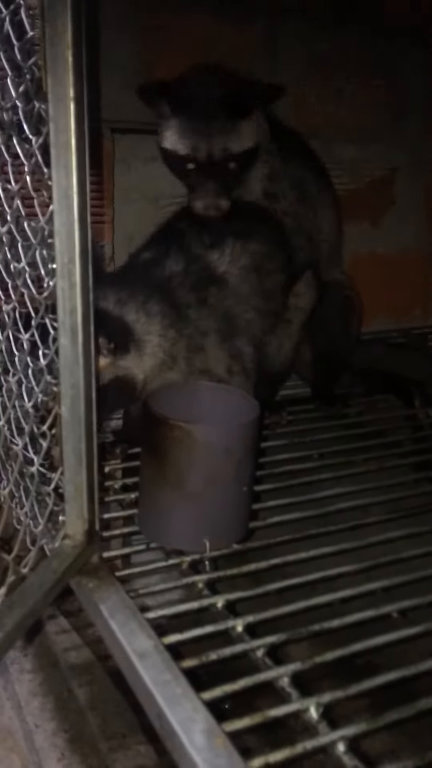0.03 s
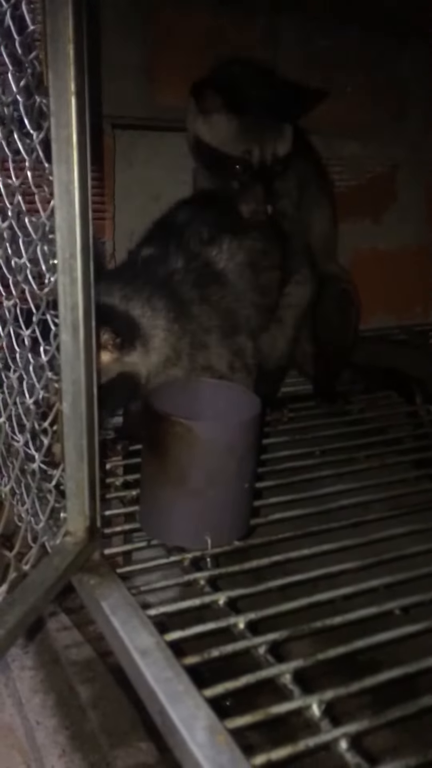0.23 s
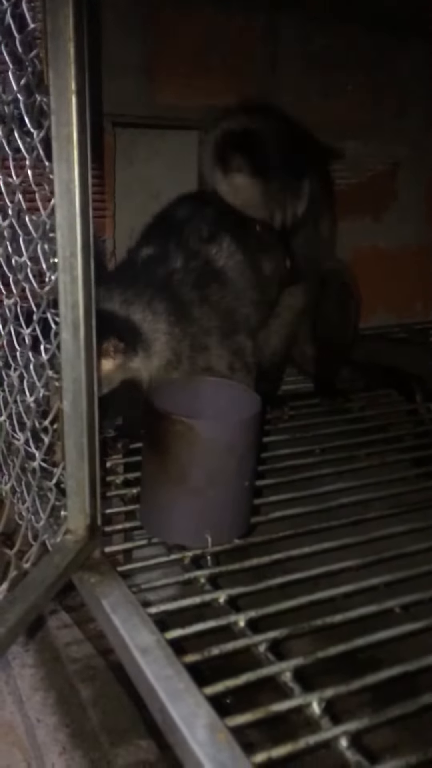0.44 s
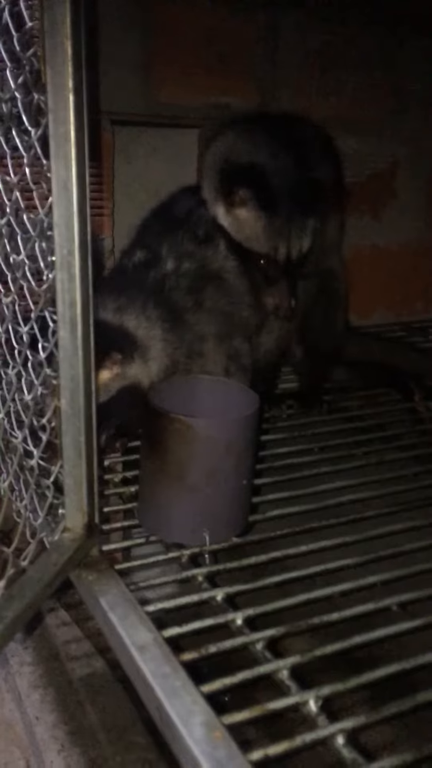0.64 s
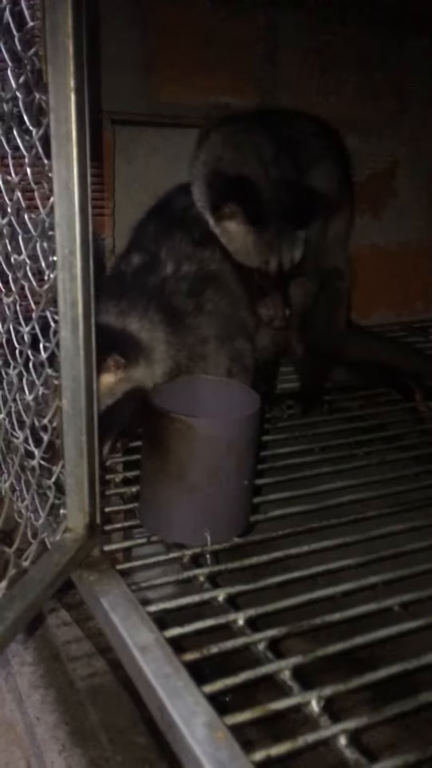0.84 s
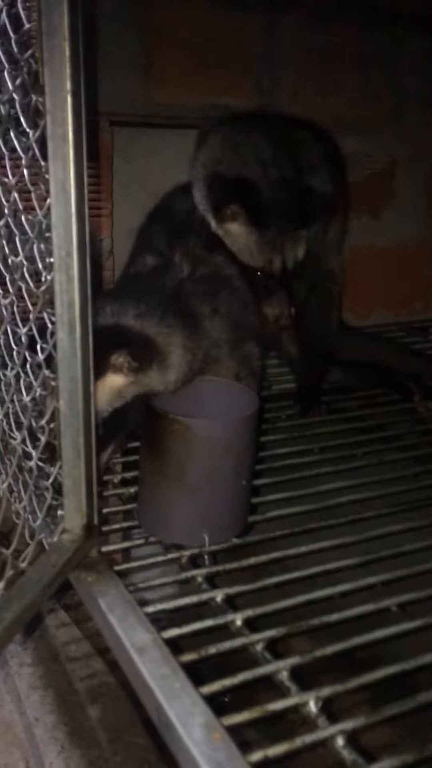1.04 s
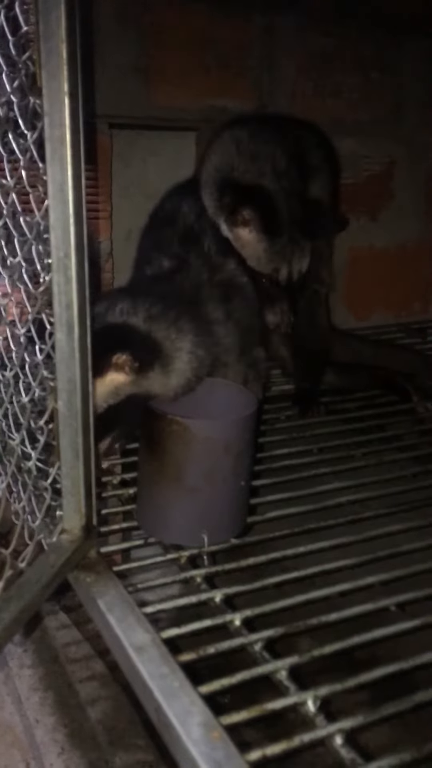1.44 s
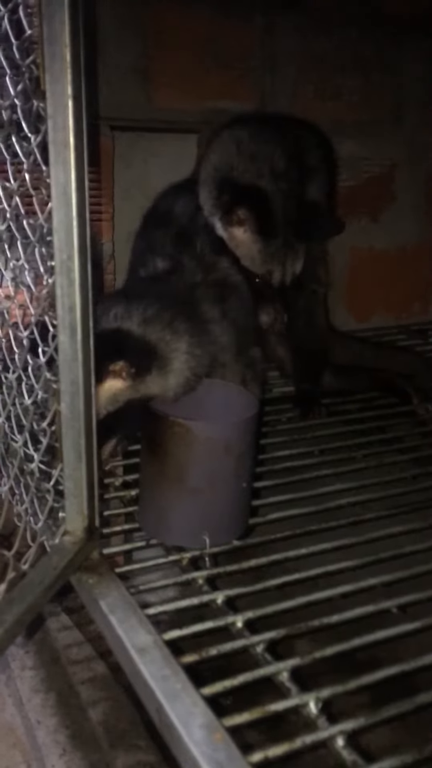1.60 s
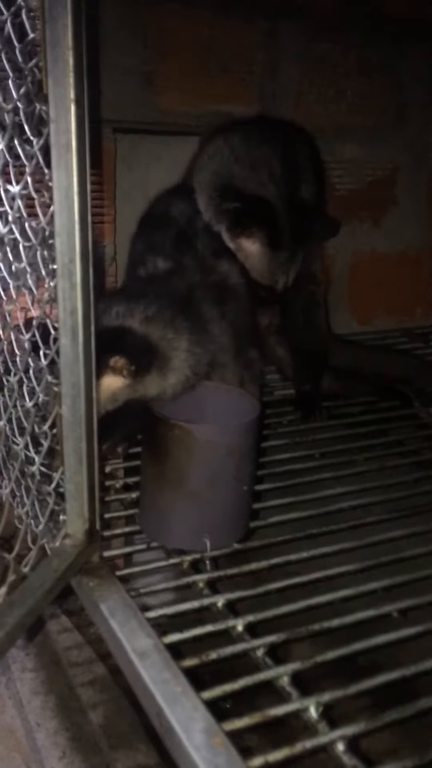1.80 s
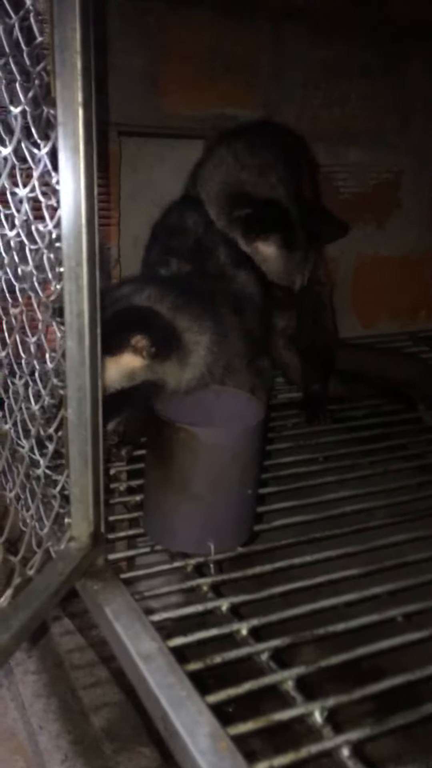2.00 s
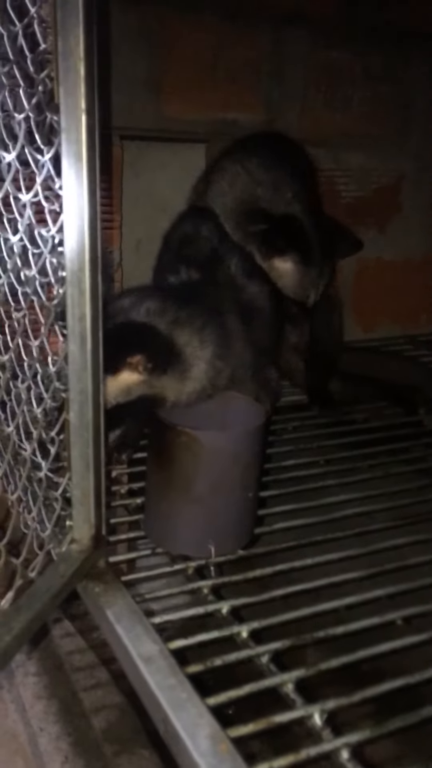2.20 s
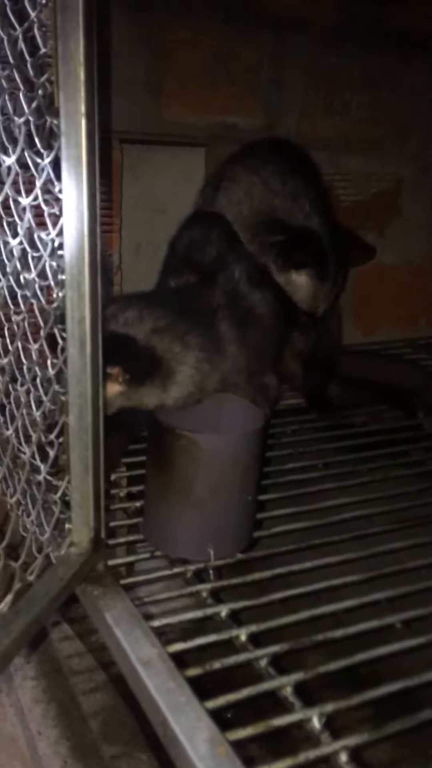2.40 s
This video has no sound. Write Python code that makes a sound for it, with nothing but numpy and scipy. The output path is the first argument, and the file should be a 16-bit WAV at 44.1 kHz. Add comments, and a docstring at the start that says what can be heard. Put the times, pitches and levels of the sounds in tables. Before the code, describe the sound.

Civets squeal close by in a wire cage, about five high, rising and falling calls a second. A faint thin whine lies under the first 0.25 seconds. The squeals are loudest and highest from 0.3 to 0.9 seconds, turning mostly lower and raspier from 1.7 until 2.5. Faint hisses and scuffles accompany them, with soft bumps near 0.5, 1.6 and 1.7, brief room reverberation and a faint low rumble.

```python
"""Civets squabbling in a cage

Two civets call in a wire cage in a small brick room, close to a mono microphone. One squeals in rapid
arches of pitch, a harmonic source filtered by throat and mouth, clear at the top and rasping when low;
the other holds a thin whine at first. Hisses, thin squeaks, scuffling and soft bumps go with the calls.
The cage resonates and the walls reverberate briefly over a low background rumble."""
import sys
import numpy as np
from scipy import signal
from scipy.fft import rfft, irfft, next_fast_len
from scipy.io import wavfile
from scipy.ndimage import uniform_filter1d, map_coordinates

SR = 44100
rng = np.random.default_rng(int(sys.argv[2]) if len(sys.argv) > 2 else 0)


def to_wav(s):
    """Save 16-bit WAV."""
    ch = np.atleast_2d(s).T  # columns
    pcm = np.round(np.clip(ch, -1, 1) * 32767)  # PCM
    wavfile.write(sys.argv[1], SR, pcm.astype(np.int16))


N = 112454
TIME_S = np.arange(N) / SR
BAND_LIMIT_HZ = 15750


def amp(db):
    """Amplitude ratio of a level in decibels."""
    return 10 ** (np.asarray(db) / 20)


def level_at(spectrum, hz):
    """Spectral envelope: levels interpolated on a logarithmic frequency axis."""
    freq_hz, level_db = np.transpose(spectrum)
    return np.interp(np.log(hz + 1), np.log(freq_hz + 1), level_db)


def contours(rows):
    """Linear interpolation in time of each column after the first."""
    time_s, *columns = np.transpose(rows)
    return [np.interp(TIME_S, time_s, column) for column in columns]


def gate(start, end, attack_s, release_s):
    """Trapezoidal envelope: rises from start, falls after end."""
    return np.clip((TIME_S - start) / attack_s, 0, 1) * np.clip(1 + (end - TIME_S) / release_s, 0, 1)


def swell(start, end):
    """Half-sine envelope from start to end."""
    return np.sin(np.pi * np.clip((TIME_S - start) / (end - start), 0, 1))


def wobble(knots_per_s):
    """Random modulation: a spline through Gaussian values."""
    return map_coordinates(rng.standard_normal(4096), [TIME_S * knots_per_s], mode="mirror")


def filtered(x, response):
    """Linear filtering: the spectrum is multiplied by a frequency response."""
    size = next_fast_len(N + SR // 4)
    return irfft(rfft(x, size) * response(np.fft.rfftfreq(size, 1 / SR)), size)[..., :N]


def noise(spectrum):
    """Spectral shaping of white noise, scaled to rms 1."""
    shaped = filtered(rng.standard_normal(N), lambda hz: amp(level_at(spectrum, hz)))
    return shaped / np.sqrt(np.mean(shaped ** 2) + 1e-20)


# spectra of the rumble and the room air: frequency_hz, gain_db
RUMBLE_SPECTRUM = [(22, -24), (60, 1), (100, 3), (119, -10), (160, -0.5), (280, -5), (1500, -61)]
AIR_SPECTRUM = [(100, -43.5), (600, 1), (2000, -0.5), (3600, -13.5), (7000, -11), (15000, -33)]
# envelope of the rumble: time_s, level_db
RUMBLE_LEVELS = [(0.0, -57), (2.12, -55), (2.22, -50)]

def background():
    """Ambient noise: a low rumble that rises near the end, and faint steady room air."""
    level_db, = contours(RUMBLE_LEVELS)
    return noise(RUMBLE_SPECTRUM) * amp(level_db) + noise(AIR_SPECTRUM) * amp(-53)


def room(x, t60_s=0.22, tail_db=-2, walls_db=-4, spread_s=0.018, predelay_s=0.003):
    """Reverberation: convolution with early wall reflections and an exponentially decaying diffuse tail."""
    t = np.arange(SR // 2) / SR
    tail = rng.standard_normal(len(t)) * amp(-60 * t / t60_s)
    delays = (rng.random(10) * spread_s * SR).astype(int)
    walls = np.bincount(delays, rng.standard_normal(10), len(t))
    response = amp(tail_db) * tail / np.linalg.norm(tail) + amp(walls_db) * walls / np.linalg.norm(walls)
    return signal.fftconvolve(x, np.pad(response, (int(predelay_s * SR), 0)))[:N]


# narrow resonances of the cage: frequency_hz, gain_db
CAGE_MODES = [(2129, 3.5), (2305, 9.5), (2502, 3), (4315, 9), (4470, 7)]

def cage(x, bandwidth_hz=15.2):
    """Sympathetic resonance: each mode rings on when a sound sweeps through its frequency."""
    def response(hz):
        damping = 1j * hz * bandwidth_hz
        return sum(amp(db) * damping / (mode_hz ** 2 - hz ** 2 + damping) for mode_hz, db in CAGE_MODES)
    return filtered(x, response)


# soft bumps on the cage floor: start_s, level_db
BUMPS = [(0.452, -43), (1.555, -47), (1.708, -44.5)]

def bumps(pitch_hz=577, t60_s=0.22, attack_s=0.0057):
    """Damped free vibration: the soft impact of a body excites one mode of the cage floor."""
    out = np.zeros(N)
    for start, level_db in BUMPS:
        age = np.maximum(TIME_S - start, 0)
        envelope = amp(level_db - 60 * age / t60_s) * (1 - np.exp(-age / attack_s))
        out += envelope * np.sqrt(2) * np.sin(2 * np.pi * pitch_hz * age)
    return out


# Gaussian swells of rubbing: centre_s, sigma_s, level_db
SCUFFLES = [(0.442, 0.032, -51.5), (1.436, 0.1, -50), (2.258, 0.11, -50)]
# spectrum of the rubbing: frequency_hz, gain_db
SCUFFLE_SPECTRUM = [(330, -10.5), (540, 9.5), (1300, -2.5), (8000, -44)]

def scuffles(flutter_db=1.4):
    """Friction noise: dull, uneven rubbing as the animals shift."""
    envelope = sum(amp(db) * np.exp(-.5 * ((TIME_S - at) / sigma) ** 2) for at, sigma, db in SCUFFLES)
    return noise(SCUFFLE_SPECTRUM) * envelope * amp(flutter_db * wobble(60))


# puffs of hiss: start_s, end_s, level_db
HISSES = [(0.187, 0.486, -55), (0.54, 0.736, -49.5), (1.047, 1.324, -45.5), (1.44, 1.71, -46),
          (1.957, 2.172, -49)]
# spectrum of the hiss: frequency_hz, gain_db
HISS_SPECTRUM = [(900, 4.5), (2200, 16), (4600, 3), (7000, -1), (10000, -3.5), (15500, -1)]

def hisses():
    """Turbulence noise: air forced through the mouth swells and fades."""
    return noise(HISS_SPECTRUM) * sum(amp(db) * swell(start, end) for start, end, db in HISSES)


# thin whistling squeaks: start_s, end_s, pitch_hz, level_db
SQUEAKS = [(1.396, 1.406, 2980, -33.5), (2.078, 2.366, 8290, -55.5)]

def squeaks(pitch_drift=0.0074):
    """Pure tones with slight random frequency modulation, each swelling and fading."""
    warped_s = np.cumsum(1 + pitch_drift * wobble(90)) / SR
    return sum(amp(db) * swell(start, end) * np.sqrt(2) * np.sin(2 * np.pi * hz * warped_s)
               for start, end, hz, db in SQUEAKS)


# contour of the other civet's whine: time_s, pitch_hz, relative_level_db
WHINE_CONTOUR = [(0.0, 1553, -52), (0.045, 1510, -60.5), (0.135, 1557, -59), (0.25, 1440, -56)]
# its harmonics, from the fundamental upward: gain_db
WHINE_HARMONICS = [-2.5, -0.5, 3.5, -5.5, -5, -27, -30, -23]

def whine(jitter=0.009, gain_db=2.5):
    """A harmonic series on a nearly level fundamental; frequency jitter makes the thin note quaver."""
    pitch_hz, level_db = contours(WHINE_CONTOUR)
    phase = 2 * np.pi * np.cumsum(pitch_hz * (1 + jitter * wobble(518.4))) / SR
    tone = np.sqrt(2) * sum(amp(db) * np.sin(k * phase) for k, db in enumerate(WHINE_HARMONICS, 1))
    envelope = gate(WHINE_CONTOUR[0][0], WHINE_CONTOUR[-1][0], attack_s=0.00068, release_s=0.035)
    return tone * amp(level_db + gain_db) * envelope


# response of the squealer's throat and mouth: frequency_hz, gain_db
TRACT_RESPONSE = [(1000, -20), (1500, -15.5), (2000, -4.5), (2700, -1), (3300, 0.5), (3800, -8), (4400, 7),
                  (5000, -2), (5500, 2.5), (7000, -1), (8300, -12), (10500, -25), (14000, -26)]

def vocal_tract_db(hz, pitch_hz, lowness, mouth_db, formant_db=7, sigma_octaves=0.54):
    """Formant filtering: as pitch climbs, the main resonance rises and the opening mouth lifts the treble."""
    formant_hz = np.interp(lowness, [0, 1], [2560, 2180])
    peak_db = formant_db * np.exp(-.5 * (np.log2(hz / formant_hz) / sigma_octaves) ** 2)
    lift_db = mouth_db + 9 * np.log2(pitch_hz / 2250)
    treble_share = np.interp(hz, [1500, 5000], [0, 1])
    return level_at(TRACT_RESPONSE, hz) + peak_db + lift_db * treble_share


def voiced_tone(phase, pitch_hz, lowness, mouth_db, doubling, tilt_db_per_octave=-4.5):
    """Source-filter model: the tract weights the harmonics; period doubling adds lines between them."""
    def gain(order):
        hz = order * pitch_hz
        level_db = vocal_tract_db(hz, pitch_hz, lowness, mouth_db) + tilt_db_per_octave * np.log2(order)
        return amp(level_db) * (hz < BAND_LIMIT_HZ)

    def partials(order):
        return (gain(order) * np.sin(order * phase)).sum(0)

    harmonics = np.arange(1, 13)[:, None]
    harmonic_rms = np.sqrt((gain(harmonics) ** 2).sum(0) / 2)
    return (partials(harmonics) + doubling * partials(harmonics + .5)) / harmonic_rms


# one contour for each squeal: time_s, pitch_hz, relative_level_db
SQUEAL_CONTOURS = [
    [(0.061, 2055, -42), (0.085, 1898, -39), (0.115, 1664, -58)],
    [(0.213, 2487, -55), (0.218, 2422, -33.5), (0.228, 1910, -41), (0.24, 1370, -36), (0.258, 944, -35)],
    [(0.275, 953, -28), (0.298, 1545, -41.5), (0.311, 2384, -31.5), (0.338, 2900, -34.5),
     (0.355, 3075, -36.5), (0.372, 2892, -83), (0.377, 2574, -26), (0.386, 2130, -34), (0.395, 1388, -37.5),
     (0.41, 980, -35.5)],
    [(0.425, 931, -34), (0.462, 1499, -38.5), (0.483, 2392, -30), (0.505, 2752, -23), (0.529, 2765, -23),
     (0.537, 2398, -35), (0.546, 1716, -35.5), (0.565, 1124, -35.5)],
    [(0.605, 947, -31), (0.635, 1552, -44), (0.65, 2124, -31), (0.664, 2540, -28), (0.68, 2756, -28.5),
     (0.703, 2787, -21.5), (0.711, 2456, -33.5), (0.721, 1582, -33.5), (0.745, 1059, -40)],
    [(0.775, 856, -43), (0.815, 1425, -38.5), (0.84, 2140, -36), (0.858, 2476, -23.5), (0.874, 2595, -34.5),
     (0.897, 2458, -31.5), (0.907, 1942, -37), (0.918, 1308, -41), (0.94, 1021, -38.5)],
    [(0.97, 973, -40.5), (0.995, 1348, -41), (1.018, 1606, -38.5), (1.035, 1920, -37), (1.068, 1930, -36.5),
     (1.085, 1432, -39.5), (1.105, 1312, -52)],
    [(1.105, 1311, -52.5), (1.175, 1430, -45.5), (1.198, 1875, -37), (1.25, 2340, -33),
     (1.268, 2014, -34.5), (1.285, 1554, -43.5), (1.31, 1062, -38)],
    [(1.325, 1031, -46), (1.355, 1596, -43), (1.382, 2285, -35.5), (1.44, 2450, -91), (1.446, 2370, -31.5),
     (1.455, 1541, -34.5), (1.47, 1218, -36), (1.505, 1063, -43)],
    [(1.52, 879.6, -44), (1.548, 1007, -35), (1.592, 1814, -37.5), (1.622, 2243, -27), (1.65, 2287, -32.5),
     (1.663, 1522, -39), (1.695, 1054, -46.5)],
    [(1.715, 1076, -50), (1.75, 891, -45.5), (1.83, 1026, -38), (1.86, 1185, -38), (1.878, 1286, -38.5),
     (1.9, 1173, -37), (1.93, 929, -40), (1.965, 888, -41)],
    [(1.972, 985, -40.5), (2.012, 1049, -33), (2.03, 1586, -38.5), (2.052, 1673, -39.5),
     (2.075, 1536, -32.5), (2.095, 1413, -38.5), (2.112, 1062, -39), (2.13, 920, -42.5)],
    [(2.13, 957, -40.5), (2.18, 1113, -37), (2.2, 1603, -37), (2.228, 2140, -37.5), (2.25, 2256, -35),
     (2.268, 2253, -35.5), (2.283, 1494, -40.5), (2.3, 1025, -39.5), (2.335, 1025, -45)],
    [(2.35, 1063, -41.5), (2.41, 866, -47), (2.48, 927.4, -42), (2.545, 843, -43)],
]
# mouth opening in each squeal: treble_lift_db
MOUTH_OPENINGS = [-18, -4, -1.5, 5.5, 7, 2.5, 1, -3.5, 3, 7.5, 2, 2.5, 1.5, 2]
# stretches of period doubling: start_s, end_s, subharmonic_gain_db
PERIOD_DOUBLINGS = [(0.983, 1.022, -1.5), (1.102, 1.179, 6), (1.711, 1.845, -6)]
# spectrum of the rasp: frequency_hz, gain_db
RASP_SPECTRUM = [(900, -20.5), (2100, 1), (3000, 1), (3800, 1), (4500, -18.5), (7000, -1), (11000, -25.5)]

def squeals(rough_hz=1112, clear_hz=2120, break_octaves_per_s=28, shimmer_db=2.5, gain_db=0.5):
    """Irregular phonation: low pitch and fast glides roughen the voice with jitter and pulsed noise."""
    out, rasp_noise = np.zeros(N), noise(RASP_SPECTRUM)
    jitter, waver, shimmer = wobble(450), wobble(90), amp(shimmer_db * wobble(160))
    doubling = sum(amp(db) * gate(start, end, 0.011, 0.007) for start, end, db in PERIOD_DOUBLINGS)
    for rows, mouth_db in zip(SQUEAL_CONTOURS, MOUTH_OPENINGS):
        (start, start_hz, _), end = rows[0], rows[-1][0]
        attack_s = np.interp(start_hz, [rough_hz, clear_hz], [0.012, 0.00068])  # a low start creeps in
        envelope = gate(start, end, attack_s, release_s=0.035)
        on = envelope > 0
        pitch_hz, level_db = (uniform_filter1d(curve, size=130)[on] for curve in contours(rows))
        lowness = np.interp(pitch_hz, [rough_hz, clear_hz], [1, 0])
        octaves_per_s = np.abs(np.gradient(np.log2(pitch_hz))) * SR
        roughness = np.clip(0.66 * lowness + octaves_per_s / break_octaves_per_s, 0, 1)
        jitter_depth = np.interp(roughness, [0, 1], [0.0037, 0.021])
        detune = jitter_depth * jitter[on] + 0.0189 * lowness ** 2 * waver[on]
        phase = 2 * np.pi * np.cumsum(pitch_hz * (1 + detune)) / SR
        tone = voiced_tone(phase, pitch_hz, lowness, mouth_db, doubling[on])
        rasp_db = np.interp(roughness, [0, 1], [-35, -12.5])
        rasp = amp(rasp_db) * rasp_noise[on] * (1 + np.cos(phase))  # one puff each cycle
        out[on] += amp(level_db + gain_db) * envelope[on] * (tone + rasp)
    return out * shimmer


def scene():
    """Superposition of the animals, cage, room and background, alike in both channels."""
    animals = squeals() + whine() + squeaks() + hisses() + scuffles()
    return np.tile(animals + cage(animals) + room(animals) + bumps() + background(), (2, 1))


def record(dry):
    """Ideal low-pass filtering: nothing passes above the band limit."""
    return filtered(dry, lambda hz: hz < BAND_LIMIT_HZ)


dry = scene()
out = record(dry)
to_wav(out)
```